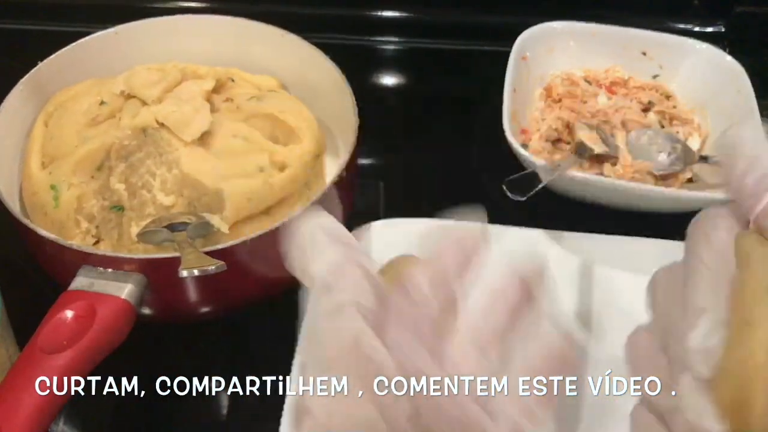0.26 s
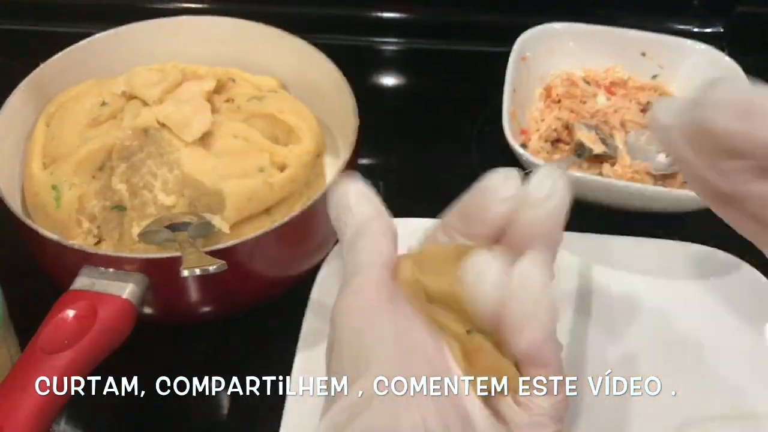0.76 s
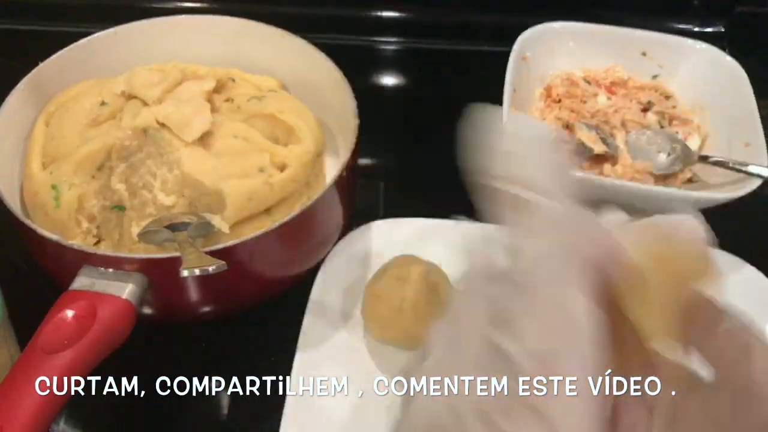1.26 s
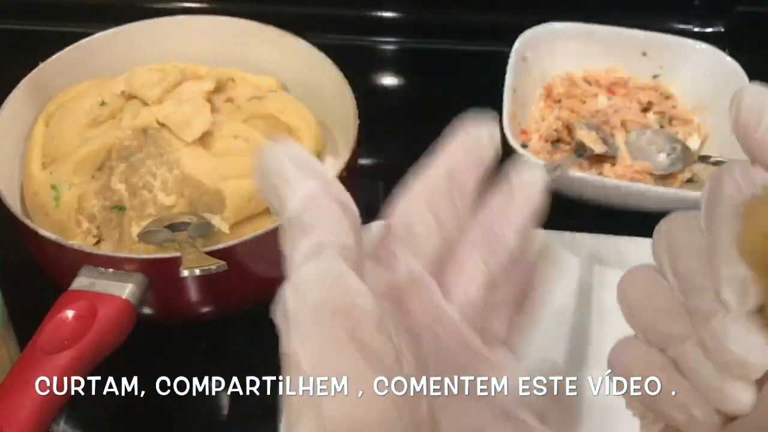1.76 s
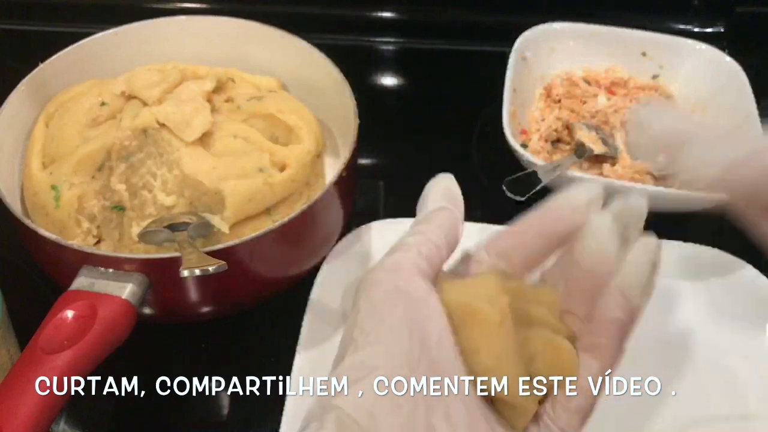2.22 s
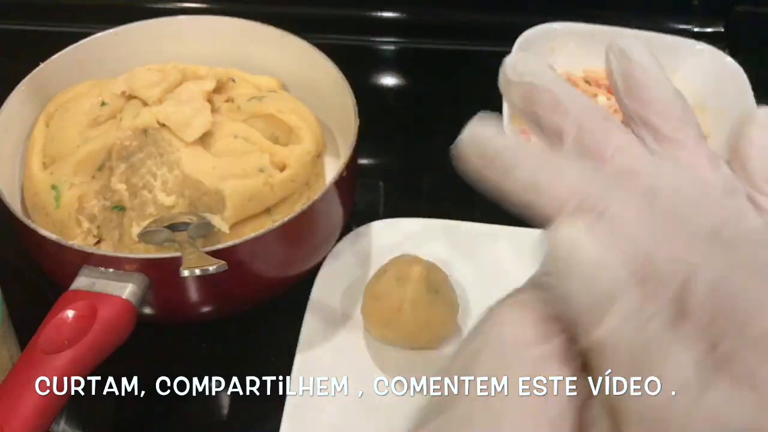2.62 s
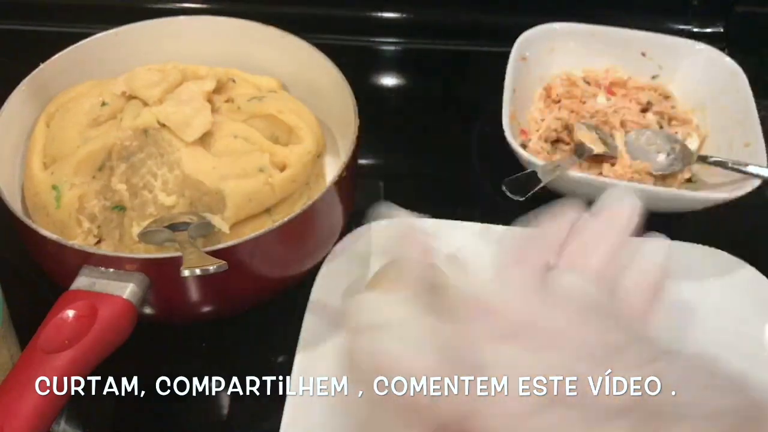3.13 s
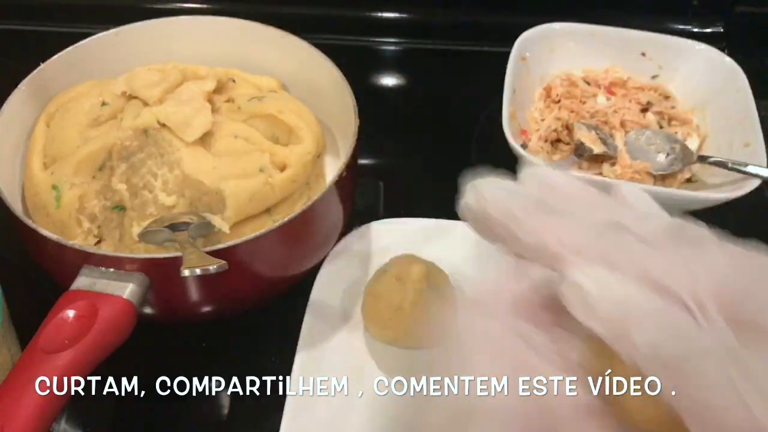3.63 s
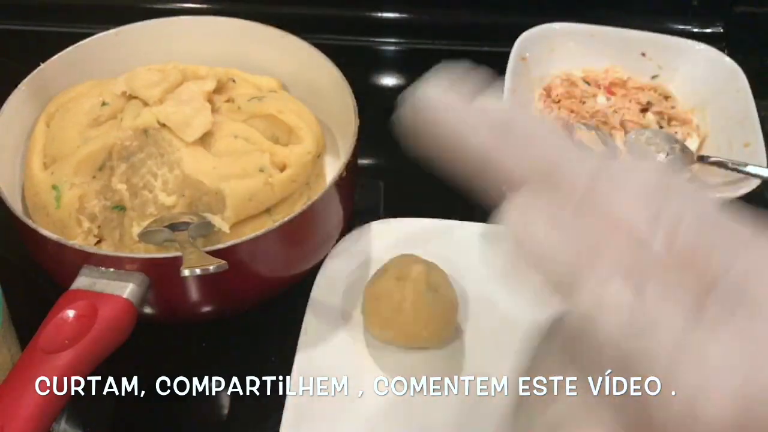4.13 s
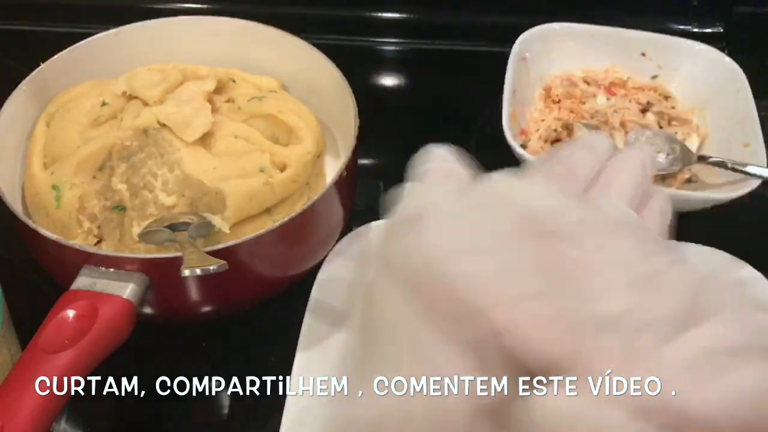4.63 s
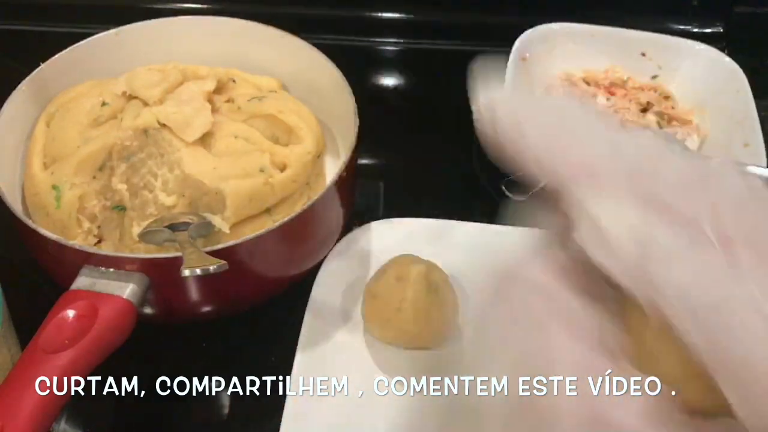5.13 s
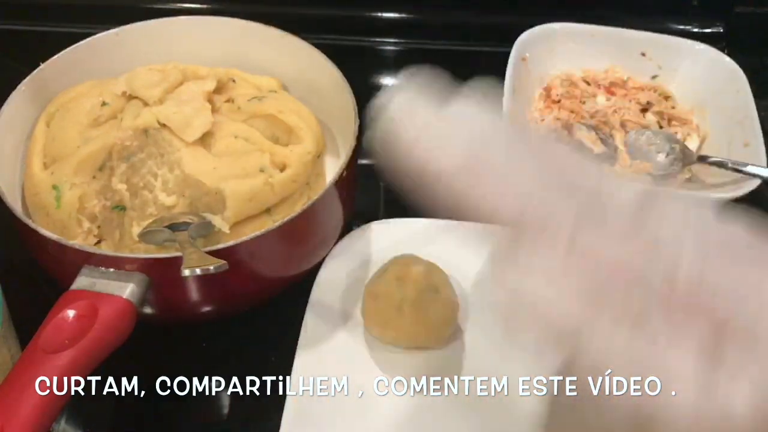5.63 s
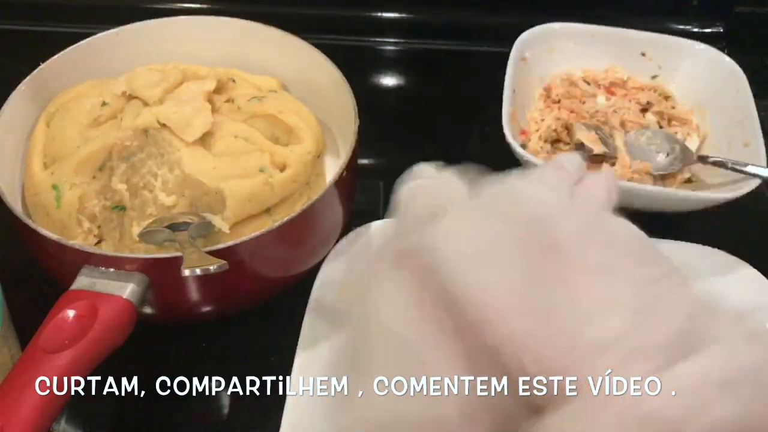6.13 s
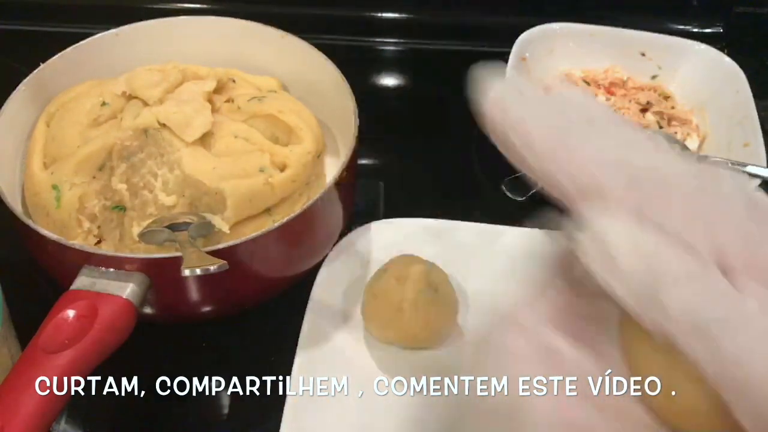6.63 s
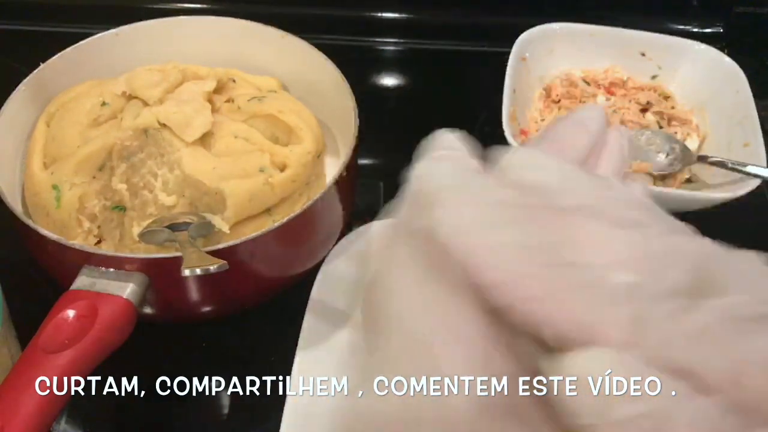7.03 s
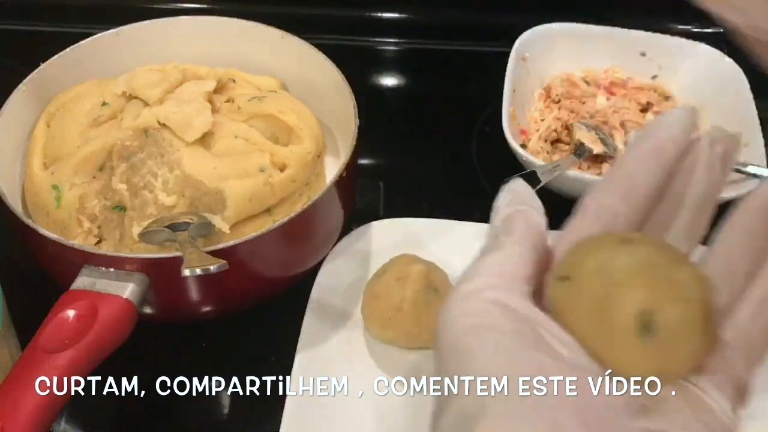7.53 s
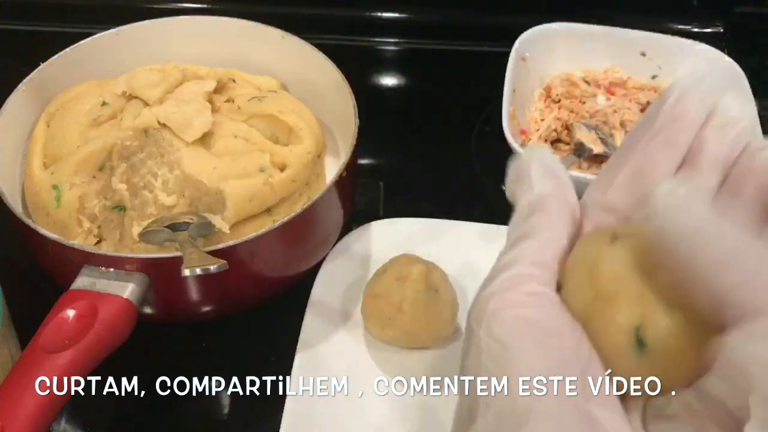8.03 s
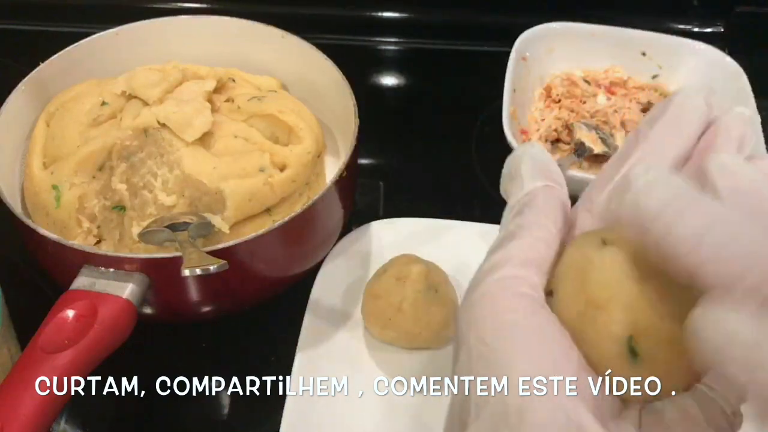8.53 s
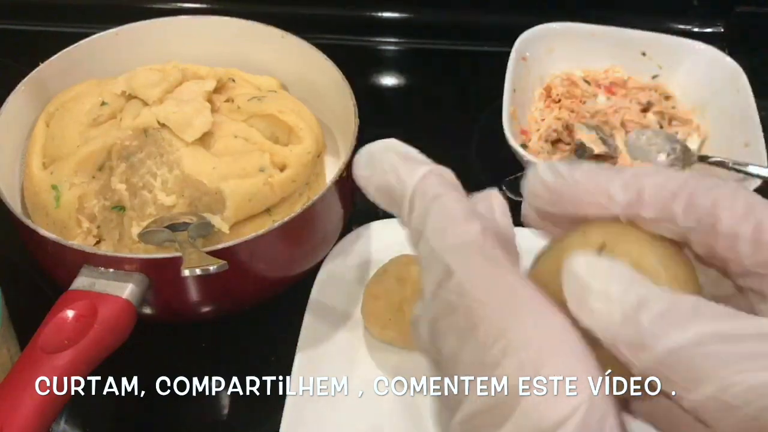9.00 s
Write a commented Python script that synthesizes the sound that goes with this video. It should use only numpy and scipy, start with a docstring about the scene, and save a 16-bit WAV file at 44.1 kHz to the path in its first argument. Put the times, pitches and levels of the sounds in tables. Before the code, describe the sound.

Close to the microphone in a small kitchen, hands in disposable plastic gloves pat and roll dough. Irregular bursts of crinkling and sliding hiss carry tiny sharp snaps, faint squishing and a few dull pats. The rustling builds into a quick run of strokes, eases, briefly rests and finishes with lighter handling. A quiet hum and dull room noise continue underneath.

```python
"""A small kitchen, the microphone close to gloved hands that pat and roll a ball of soft dough.
A low lumpy hum, mains lines and a dull airy rush are there from the start. At once the thin plastic
buckles in crinkles and hisses as it slides; single folds begin to snap, and from half a second a palm
now and then thuds on the dough. The hands are busiest from about 2.5 to 4.7 s, nearly rest just
before 8 s and finish with lighter strokes."""
import sys
import numpy as np
from scipy import signal
from scipy.fft import rfft, irfft, next_fast_len
from scipy.io import wavfile
from scipy.ndimage import uniform_filter1d, map_coordinates

SR = 44100
rng = np.random.default_rng(int(sys.argv[2]) if len(sys.argv) > 2 else 0)


def digitize_waveform(pressure):
    """Quantize a signal to 16-bit integers and store it at the path in sys.argv[1].

    Rows of a 2-D input are taken as channels; values are limited to [-1, 1].
    """
    field = np.atleast_2d(pressure).T
    bounded = np.clip(field, -1, 1)
    quanta = np.round(bounded * 32767).astype(np.int16)
    wavfile.write(sys.argv[1], SR, quanta)


N = 408461

# The low hum's resonances. Each row: centre in Hz, width in Hz, gain in dB.
HUM_MODES = [(261.3, 36, 5), (319.3, 32.7, 5)]
# The hum's slow course. Each row: time in seconds, level in dB.
HUM_LEVELS = [(0, -49), (0.3, -57), (2.2, -55), (3.8, -58), (4.8, -53.5), (5.4, -60.5), (6.3, -54),
              (7.4, -58.5), (7.6, -71), (8.1, -61.5), (8.3, -56), (9.26, -55.5)]
# Mains lines. Each row: frequency in Hz, rms level in dB.
MAINS_LINES = [(59.5, -76.5), (119.7, -68.5)]
# The airy room tone. Each row: frequency in Hz, relative spectral level in dB.
AIR_SPECTRUM = [(18, -50), (30, -22.5), (114, -4), (173, 0), (263, 5.5), (546, -3.5), (1170, -6.5),
                (1360, -3), (1870, -10.5), (2910, -12.5), (3490, -8), (7650, -15), (15500, -23.5)]
# Strokes of the hands. Each row: time of the peak in seconds, length in ms, crinkle level in dB,
# fold pitch in Hz, sliding hiss level in dB.
HAND_STROKES = [(0.005, 44, -40.5, 3600, -49), (0.172, 250, -53, 3600, -58.5),
                (0.278, 76, -45.5, 2660, -61.5), (0.467, 153, -32.5, 2710, -38),
                (0.582, 37, -26, 3360, -49), (0.889, 100, -46, 3750, -54.5), (1.162, 135, -36.5, 2660, -38),
                (1.368, 81, -31, 3620, -39.5), (1.685, 55, -48, 4440, -57.5),
                (1.791, 150, -44.5, 3490, -53), (2.019, 146, -36, 2060, -38), (2.119, 78, -40, 3750, -41),
                (2.225, 27, -49, 3360, -52.5), (2.41, 81, -56.5, 2720, -59), (2.591, 76, -30.5, 3290, -39),
                (2.651, 81, -36, 2570, -39.5), (2.764, 110, -59.5, 2660, -49),
                (2.846, 61, -38, 3730, -41.5), (2.907, 78, -33.5, 2990, -38), (2.995, 120, -49, 4370, -41),
                (3.092, 139, -30, 2850, -36.5), (3.261, 100, -32.5, 3460, -37.5),
                (3.33, 43, -32.5, 3660, -40), (3.404, 115, -27, 3150, -32), (3.55, 164, -35, 3640, -38),
                (3.699, 113, -28, 3196, -35), (3.879, 123, -32.5, 3270, -39.5),
                (4.021, 102, -27.5, 3310, -34), (4.161, 66, -34, 3220, -38.5),
                (4.233, 56, -41.5, 3440, -47), (4.322, 108, -29, 3420, -38.5), (4.423, 34, -65, 4270, -33),
                (4.492, 96, -44.5, 3470, -47), (4.588, 48, -32, 3180, -45.5), (4.634, 39, -28, 3380, -36),
                (4.861, 117, -33.5, 3500, -49.5), (4.932, 74, -36, 3170, -42.5),
                (5.026, 18, -56, 4100, -42), (5.118, 73, -42.5, 2620, -51.5), (5.21, 105, -39, 2860, -48.5),
                (5.319, 19, -46, 3540, -48), (5.407, 73, -42.5, 2640, -56), (5.511, 84, -33.5, 3250, -41),
                (5.725, 57, -53, 2820, -51), (5.79, 67, -43.5, 3830, -53.5),
                (5.843, 44, -30.5, 3360, -39.5), (5.94, 40, -33, 4000, -55), (6.1, 145, -38, 3500, -49.5),
                (6.303, 140, -40.5, 3750, -54.5), (6.421, 75, -35.5, 2870, -39),
                (6.524, 33, -44, 4120, -47), (6.715, 116, -36, 2950, -49), (6.86, 120, -60, 2550, -57),
                (6.98, 94, -35, 3300, -53), (7.038, 47, -33, 3670, -42), (7.192, 26, -39.5, 3200, -50.5),
                (7.285, 134, -38, 2900, -50), (7.52, 58, -39, 3064, -55.5), (8.137, 94, -50, 3920, -43),
                (8.261, 46, -40, 4190, -55), (8.372, 28, -66.5, 4250, -40), (8.499, 47, -37.5, 3200, -46.5),
                (8.608, 32, -36.5, 4260, -42.5), (8.822, 140, -50, 3450, -55.5),
                (8.976, 217, -43.5, 3440, -44), (9.152, 130, -47.5, 3290, -53.5)]
# Light rubbing between the strokes. Each row: time in seconds, crinkle level in dB.
RUB_LEVELS = [(0, -63), (1.5, -60), (2.5, -66.5), (2.7, -80.5), (4.6, -58), (4.75, -56), (5.8, -55),
              (7.45, -57), (7.58, -67), (8.05, -62), (8.3, -65.5), (9.26, -61.5)]
# Fixed resonances that colour the crinkling. Each row: centre in Hz, width in Hz, gain in dB.
CRINKLE_RESONANCES = [(1505, 387, 16), (2386, 120, 6.5), (3300, 480, -3.5), (4100, 180, -10.5),
                      (5900, 4500, -26.5)]
# Film sliding on film. Each row: frequency in Hz, relative spectral level in dB.
SLIDE_SPECTRUM = [(1500, -11), (2800, 0.5), (4500, 8), (6500, 3), (9000, 1), (12000, -1), (15700, -1.5)]
# Narrow bands missing from the film's crinkle, hiss and snaps.
# Each row: centre in Hz, width in Hz, depth from 0 to 1.
FILM_DIPS = [(1980, 340, 0), (4830, 250, 0.64), (7720, 1500, 0.46), (10300, 910, 0.6)]
# Single folds snapping through. Each row: start in seconds, level in dB, pitch in Hz, edge level in dB.
FOLD_SNAPS = [(0.264, -11, 2690, -32), (0.449, -9, 2660, -35), (0.4578, -4.5, 2466, -26),
              (0.4852, -6, 2530, -42), (0.5393, -13, 6040, -21), (0.592, -13.5, 2920, -23),
              (0.756, -24, 2800, -49), (0.814, -13, 3900, -40.5), (1.1113, -4.5, 3070, -20.5),
              (1.1205, -9, 4600, -30.5), (1.1542, -7, 3640, -32), (1.158, -9.5, 2730, -27.5),
              (1.1625, -15, 3010, -40.5), (1.166, -1, 2570, -27), (1.1744, -4.5, 3380, -18.5),
              (1.195, -13, 2780, -24), (1.229, -16, 3640, -27), (1.3872, -16, 4070, -28),
              (1.4679, -12.5, 3360, -52.5), (1.7992, -31.5, 6200, -29.5), (1.9846, -12, 3590, -45),
              (2.0197, -7.5, 2270, -43), (2.0298, -5, 1995, -41), (2.2625, -18.5, 4360, -54.5),
              (2.3515, -30, 2730, -38.5), (2.3724, -22.5, 2570, -55), (2.478, -12, 4250, -43.5),
              (2.5685, -17, 6200, -30), (2.6126, -13, 2485, -38), (2.6452, -11, 4530, -38),
              (2.681, -17, 2810, -37), (2.7155, -24, 6900, -34), (2.7226, -10, 2225, -43),
              (2.7406, -12, 2810, -32.5), (2.7673, -13, 2960, -28.5), (2.7809, -5.5, 2570, -32),
              (2.894, -12, 4770, -34), (3.0541, -9, 2600, -51), (3.0596, -13.5, 2730, -50),
              (3.1158, -7.5, 3820, -21), (3.3404, -13.5, 3660, -25), (3.359, -11, 5860, -30),
              (3.38, -17, 2880, -41), (3.421, -9.5, 3220, -34), (3.4778, -12.5, 3070, -37),
              (3.7344, -17.5, 3960, -28), (3.7503, -13.5, 3060, -31), (4.0366, -8, 3070, -21.5),
              (4.1308, -13, 3100, -31), (4.1403, -8.5, 3330, -36), (4.1538, -14, 4300, -28.5),
              (4.1804, -15, 2650, -49), (4.287, -23.5, 6700, -25), (4.5756, -9.5, 2670, -38),
              (4.6025, -16.5, 3780, -42), (4.6296, -15, 3370, -34), (4.6354, -10.5, 3300, -24.5),
              (4.6505, -11.5, 3360, -41), (4.800, -19, 2600, -46), (4.843, -19.5, 6350, -57),
              (5.106, -14.5, 2600, -42), (5.2487, -17, 2360, -35), (5.3602, -18, 3220, -56),
              (5.393, -11.5, 2550, -51), (5.5345, -9, 5980, -22), (5.9328, -13.5, 5860, -40),
              (5.9948, -13, 4870, -53), (6.0805, -10.5, 4200, -32), (6.3055, -17, 4430, -54),
              (6.369, -19.5, 6000, -46), (6.394, -14, 3650, -47.5), (6.4485, -16.5, 2470, -34.5),
              (6.5875, -20.5, 3900, -50), (6.6895, -13.5, 3670, -35), (6.7072, -17, 2290, -49),
              (6.9188, -25.5, 3800, -55), (6.941, -18, 3330, -60.5), (6.967, -25, 3770, -44.5),
              (7.0366, -20, 3490, -30), (7.139, -30, 2580, -43.5), (7.1973, -17, 4600, -51.5),
              (7.2712, -7, 3400, -32), (7.274, -11.5, 2700, -42), (7.2927, -18, 3120, -45),
              (7.409, -31, 3250, -58), (7.4409, -24, 3620, -57), (7.5098, -13.5, 3280, -39),
              (7.929, -28.5, 4170, -46.5), (8.112, -18.5, 4000, -25.5), (8.1489, -18, 3780, -41),
              (8.241, -30, 4280, -40.5), (8.3754, -16.5, 4190, -43), (8.3848, -18.5, 4230, -47),
              (8.4221, -21, 4680, -40), (8.483, -36.5, 2550, -44), (8.6143, -11.5, 4160, -41.5),
              (8.6183, -19.5, 4260, -33.5), (8.988, -22, 3400, -51), (9.0887, -22.5, 3540, -56)]
# Reflections off a pan, a bowl and a wall close by. Each row: delay in ms, gain in dB.
NEAR_ECHOES = [(7, -8), (12, -57), (18, -28)]
# Palms meeting the dough. Each row: start in seconds, relative level in dB, pitch in Hz.
PALM_PATS = [(0.482, -39.5, 574), (1.166, -32, 564), (1.388, -47, 273), (2.039, -39.5, 310),
             (2.621, -44.5, 288), (2.909, -48, 840), (3.264, -39.5, 694), (5.974, -35.5, 295),
             (8.485, -37.5, 928)]
# The kitchen's reverberation. Each row: frequency in Hz, time to fall 60 dB in seconds.
KITCHEN_DECAY = [(500, 0.17), (3000, 0.03), (10000, 0.024)]

BIG_FOLD_HZ = 2600  # folds pitched above this are smaller and ring more briefly


def amp(db):
    return 10 ** (np.asarray(db) / 20)


def unit_rms(x):
    return x / np.sqrt(np.mean(x ** 2) + 1e-20)


def over_pitch(points, hz):
    """Join (Hz, value) points along a log frequency axis."""
    point_hz, values = np.transpose(points)
    return np.interp(np.log(hz + 1), np.log(point_hz + 1), values)


def over_time(points):
    """Join (seconds, value) points into one value per sample."""
    return np.interp(np.arange(N) / SR, *np.transpose(points))


def wobble(knots_per_s):
    """A smooth random curve."""
    knots = rng.standard_normal(int(N * knots_per_s / SR) + 4)
    return map_coordinates(knots, [np.arange(N) * knots_per_s / SR])


def filtered(x, response):
    """Pass x through a complex response given as a function of Hz."""
    size = next_fast_len(N + SR // 2)
    return irfft(rfft(x, size) * response(np.fft.rfftfreq(size, 1 / SR)), size)[..., :N]


def high_pass(f, corner_hz, order):
    return (1j * f / (corner_hz + 1j * f)) ** order


def resonances(f, modes):
    """Summed response of (Hz, width in Hz, dB) resonances."""
    return sum(amp(db) * 1j * f * width / (hz * hz - f * f + 1j * f * width) for hz, width, db in modes)


def patchy_noise(spread_db, bins, frames):
    """White noise whose gain varies in patches over pitch and time."""
    cells = signal.stft(rng.standard_normal(N), nperseg=256)[2]
    patches = uniform_filter1d(uniform_filter1d(rng.standard_normal(cells.shape), bins, 0), frames, 1)
    return unit_rms(signal.istft(cells * amp(spread_db * unit_rms(patches)), nperseg=256)[1][:N])


def grains(start, hz, size, cycles, length=256, rise=0.8):
    """Sum of sines that build over `rise` cycles, decay over `cycles` and end at `length` samples."""
    age = np.arange(length)
    turns = age * np.clip(hz, 100, SR / 2.5)[:, None] / SR
    envelope = np.exp(-turns / cycles) * (1 - np.exp(-(turns / rise) ** 2)) * (1 - age / length)
    waves = size[:, None] * envelope * np.sin(2 * np.pi * turns)
    return np.bincount((start[:, None] + age).ravel(), waves.ravel(), N + length)[:N]


def patter(count, spread_db):
    """Random start samples, normal pitch offsets and signed sizes of which a few are large."""
    when, chance, polarity = rng.random((count, 3)).T
    size = amp(spread_db * np.minimum(-np.log(chance), 4)) * np.sign(polarity - 0.5)
    return (when * N).astype(int), rng.standard_normal(count), size


def room_tone():
    """Behind the hands: a lumpy low hum in two resonances, the mains lines and a patchy rush of air."""
    t = np.arange(N) / SR
    hum = unit_rms(filtered(rng.standard_normal(N), lambda f: resonances(f, HUM_MODES) ** 2))
    mains = sum(np.sqrt(2) * amp(db + 1.5 * wobble(2.42)) * np.sin(2 * np.pi * hz * t)
                for hz, db in MAINS_LINES)
    noise = patchy_noise(spread_db=2.8, bins=2, frames=30)
    air = unit_rms(filtered(noise, lambda f: amp(over_pitch(AIR_SPECTRUM, f))))
    lumps_db = 5 * wobble(14)
    return amp(over_time(HUM_LEVELS) + lumps_db) * hum + mains + amp(-51.5) * air


def strokes(rise_share=0.4, flurry_ms=(6, 38.3), creep_db=-12, creep_s=0.025):
    """Crinkle gain, fold pitch and hiss gain per sample; the film creeps on after each stroke."""
    rows = [(s, rise_share * ms, (1 - rise_share) * ms, db, hz, hiss_db)
            for s, ms, db, hz, hiss_db in HAND_STROKES]
    # Each snap sets off a short flurry of folds, weaker for a small high fold.
    rows += [(s, *flurry_ms, db - 30 - 4 * np.log2(hz / BIG_FOLD_HZ), hz, edge_db - 18.5)
             for s, db, hz, edge_db in FOLD_SNAPS]
    peak_s, rise_ms, fall_ms, crinkle_db, hz, slide_db = np.transpose(rows)[:, :, None]
    t = np.arange(0, N, 44) / SR
    away_ms = 1000 * np.abs(t - peak_s)
    swell = 0.1 ** np.where(t < peak_s, (away_ms / rise_ms) ** 2.28, (away_ms / fall_ms) ** 2.33)
    creep = amp(creep_db) ** 2 * np.exp(-np.abs(t - peak_s) / creep_s) * np.where(t > peak_s, 1 - swell, 0)
    crinkle_power = amp(crinkle_db) ** 2 * (swell + creep) + 1e-12
    slide_power = amp(slide_db) ** 2 * (swell + 0.1 * creep)
    fold_hz = np.exp(np.sum(crinkle_power * np.log(hz), 0) / crinkle_power.sum(0))
    controls = np.sqrt(crinkle_power.sum(0)), fold_hz, np.sqrt(slide_power.sum(0))
    return [np.interp(np.arange(N) / SR, t, control) for control in controls]


def crinkles(fold_hz):
    """Small folds buckle around one pitch, and the sticky film squeaks close to it."""
    start, offset, size = patter(count=10000, spread_db=3)
    hz = fold_hz[start] * np.exp(0.23 * offset + 0.03)
    folds = grains(start, hz, size * np.exp(0.24 * offset), cycles=6)
    folds = unit_rms(filtered(folds, lambda f: 0.057 + resonances(f, CRINKLE_RESONANCES)))
    start, offset, size = patter(count=1200, spread_db=4.5)
    hz = fold_hz[start] * np.exp(0.0705 * offset)
    squeaks = grains(start, hz, size, cycles=48, length=768, rise=1.9)
    return folds + amp(-8) * unit_rms(squeaks)


def sliding_hiss():
    """Film slides on film with a hiss full of tiny ticks."""
    start, offset, size = patter(count=2500, spread_db=3.5)
    ticks = unit_rms(grains(start, 8000 * np.exp(0.381 * offset), size, cycles=5, length=128))
    noise = patchy_noise(spread_db=5.05, bins=6, frames=8)
    hiss = unit_rms(filtered(noise, lambda f: amp(over_pitch(SLIDE_SPECTRUM, f))))
    return hiss + 0.45 * ticks


def film_colour(f):
    """Thin film moves no air at low pitch, and a few narrow treble bands sound weaker."""
    dips = [1 - depth * resonances(f, [(hz, width, 0)]) for hz, width, depth in FILM_DIPS]
    return high_pass(f, corner_hz=755, order=6) * np.prod(dips, axis=0)


def gloves():
    """Close up, each stroke crinkles the film in clumps, slides it with a judder and presses the dough."""
    crinkle_gain, fold_hz, slide_gain = strokes()
    rub = amp(over_time(RUB_LEVELS))
    crinkle_gain = np.hypot(crinkle_gain, rub)
    slide_gain = np.hypot(slide_gain, amp(-4.5) * rub)
    folds, hiss = crinkles(fold_hz), sliding_hiss()
    clumps, judder = amp(2.11 * wobble(60)), amp(1.44 * wobble(50))
    film = crinkle_gain * clumps * folds + amp(4) * slide_gain * judder * hiss
    squish = unit_rms(filtered(rng.standard_normal(N), lambda f: resonances(f, [(880, 4000, 0)]) ** 2))
    return filtered(film, film_colour) + amp(-17.5) * crinkle_gain * squish


def snaps():
    """A fold cracks through with a bright edge and rings; the air pocket under it rings on."""
    start_s, db, hz, edge_db = np.transpose(FOLD_SNAPS)
    start = np.round(start_s * SR).astype(int)
    detune = rng.standard_normal((len(start), 3)).T
    smallness = hz / BIG_FOLD_HZ
    ring = grains(start, hz, amp(db), cycles=4.73 * smallness[:, None] ** -0.49)
    pocket = grains(start, hz, amp(db - 24 - 5 * np.log2(smallness)), cycles=74, length=2048, rise=9)
    partial = grains(start, 1.32 * hz * np.exp(0.22 * detune[0]), amp(db - 16), cycles=20)
    crack = grains(start, 1.49 * hz, amp(db - 10.5), cycles=2, rise=0.35)
    edge_size = amp(edge_db + 8.5)
    edge = grains(start, 7500 * np.exp(0.097 * detune[1]), edge_size, cycles=4, rise=0.11)
    high_edge = grains(start, 12500 * np.exp(0.1 * detune[2]), edge_size, cycles=3.5, rise=0.3)
    return ring + pocket + partial + crack + edge + high_edge


def echoes(f):
    """Hard things near the microphone send a snap back just after the direct sound."""
    return 1 + sum(amp(db) * np.exp(-2j * np.pi * f * ms / 1000) for ms, db in NEAR_ECHOES)


def pats():
    """Under a palm, soft dough gives one damped, hollow thud."""
    start_s, db, hz = np.transpose(PALM_PATS)
    start = np.round(start_s * SR).astype(int)
    thud = grains(start, hz, amp(db + 14.5), cycles=1.52, length=1500)
    overtone = grains(start, 1.58 * hz, amp(db + 7), cycles=2.1, length=1500)
    return thud + overtone


def kitchen_reverb(x):
    """The small room answers about 4 ms late, its treble dying first."""
    hz, t, cells = signal.stft(rng.standard_normal(SR // 3), SR, nperseg=256)
    decay = amp(-60 * t / over_pitch(KITCHEN_DECAY, hz)[:, None])
    tail = signal.istft(cells * decay, SR, nperseg=256)[1]
    return signal.fftconvolve(np.pad(x, (180, 0)), tail / np.linalg.norm(tail))[:N]


def noise_suppressor(x, margin_db, depth_db, from_hz):
    """Treble that barely exceeds its band's quiet level is turned down."""
    hz, _, cells = signal.stft(x, SR, nperseg=512)
    power = np.abs(uniform_filter1d(np.abs(cells) ** 2, size=5, axis=2)) + 1e-20
    quiet = np.percentile(power, 10, axis=2, keepdims=True)
    excess = uniform_filter1d(power / quiet, size=11, axis=1)
    treble = (hz / (hz + from_hz))[:, None] ** 2
    gain = np.maximum(1 - amp(margin_db) ** 2 / excess * treble, amp(depth_db))
    return signal.istft(cells * gain, SR, nperseg=512)[1][:, :N]


def scene():
    """One microphone: the hands close and fairly dry, the kitchen behind them."""
    hands = gloves() + filtered(snaps(), lambda f: echoes(f) * film_colour(f)) + pats()
    return (hands + amp(-12.5) * kitchen_reverb(hands) + room_tone())[None]


def record(dry):
    """The microphone rolls off the bass; the recorder suppresses treble noise and cuts the very top."""
    clean = noise_suppressor(dry, margin_db=2.5, depth_db=-19.5, from_hz=1520)
    return filtered(clean, lambda hz: high_pass(hz, corner_hz=92.5, order=1) * (hz < 15750))


dry = scene()
out = record(dry)
digitize_waveform(out)
```